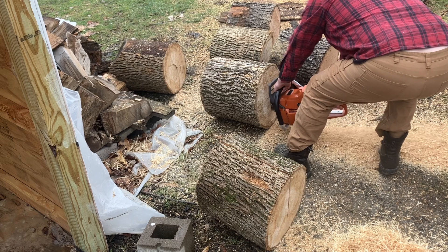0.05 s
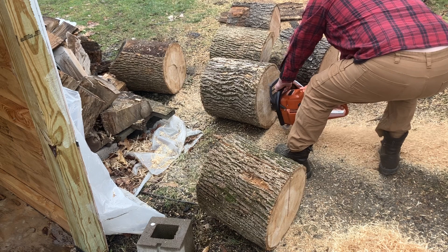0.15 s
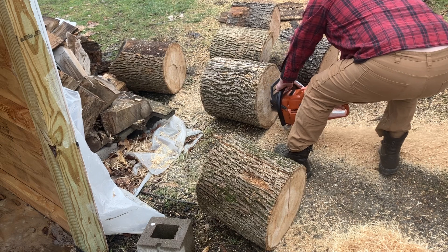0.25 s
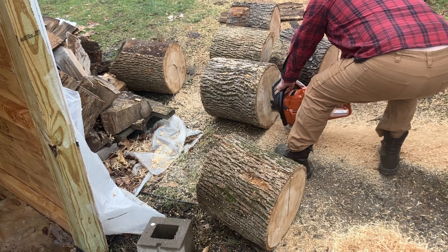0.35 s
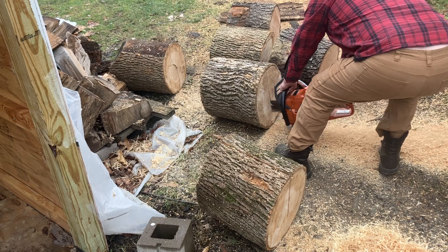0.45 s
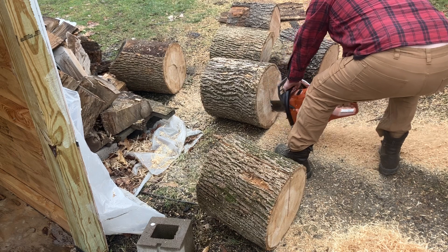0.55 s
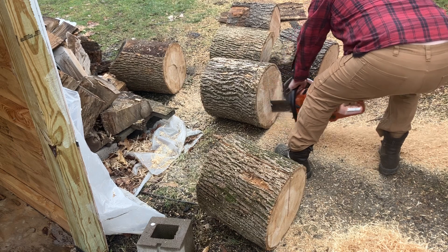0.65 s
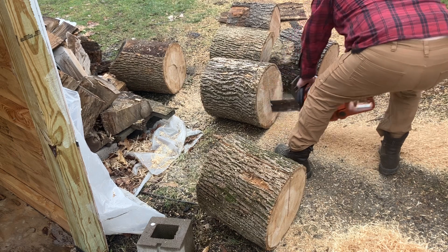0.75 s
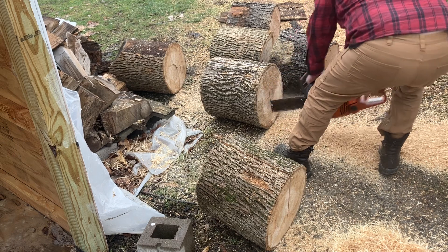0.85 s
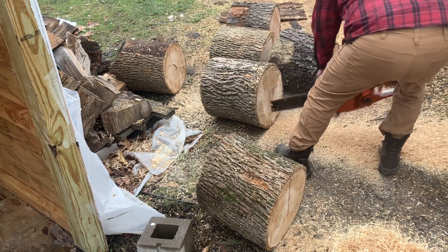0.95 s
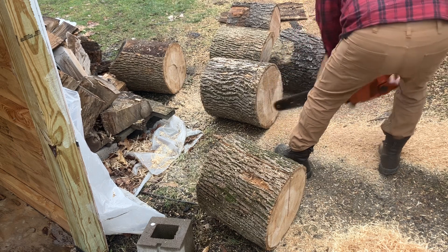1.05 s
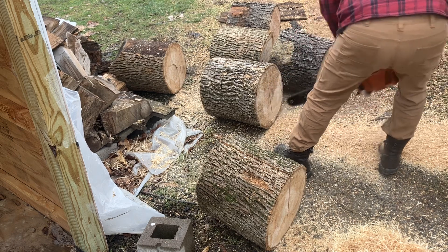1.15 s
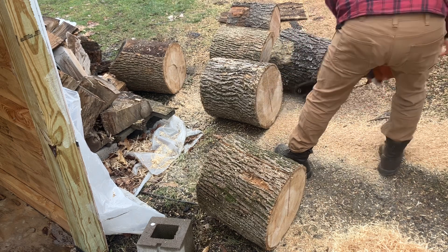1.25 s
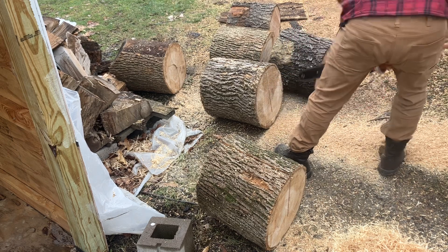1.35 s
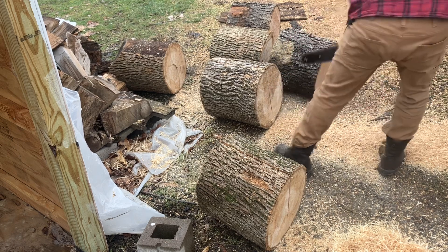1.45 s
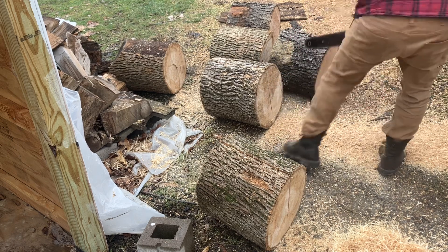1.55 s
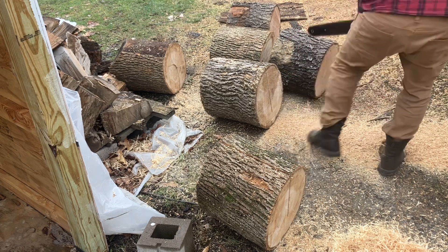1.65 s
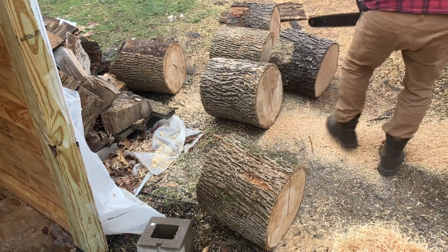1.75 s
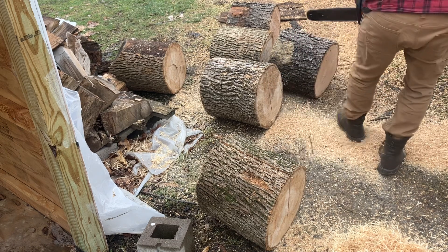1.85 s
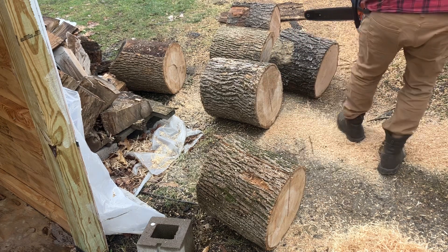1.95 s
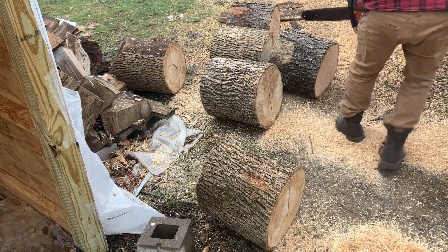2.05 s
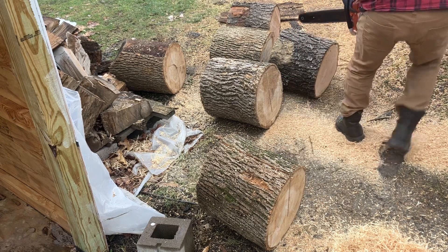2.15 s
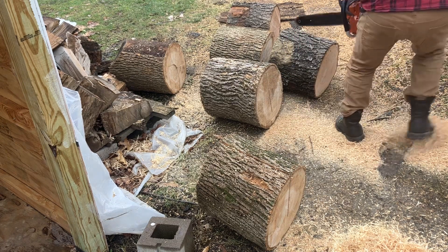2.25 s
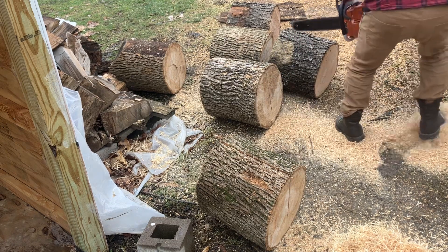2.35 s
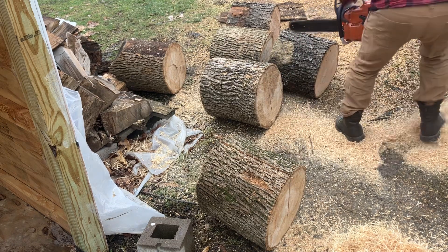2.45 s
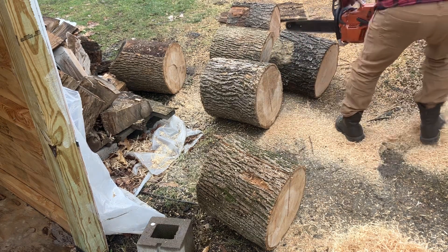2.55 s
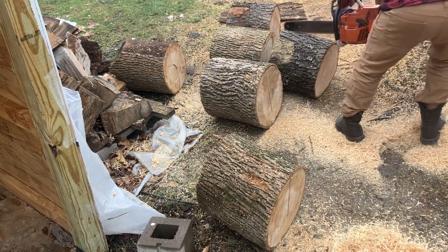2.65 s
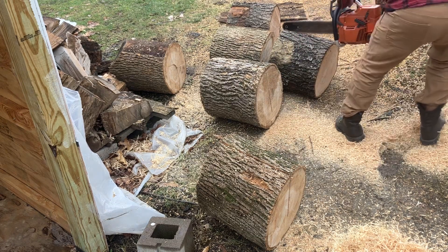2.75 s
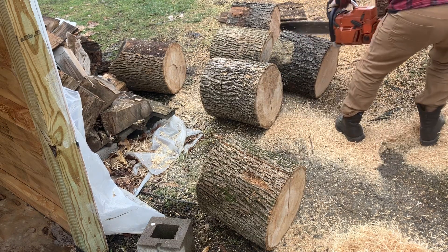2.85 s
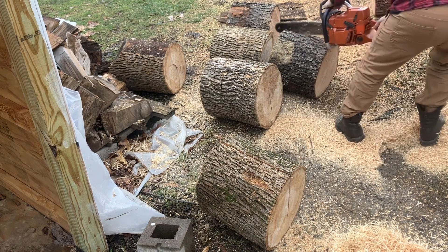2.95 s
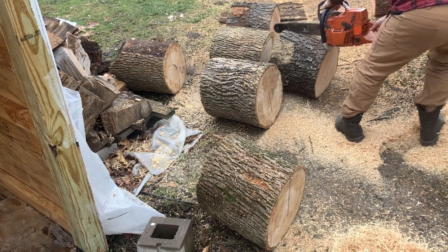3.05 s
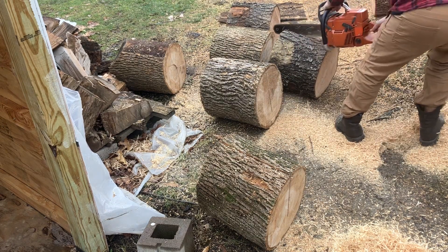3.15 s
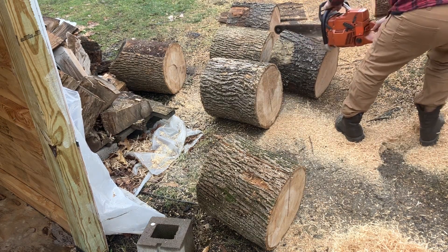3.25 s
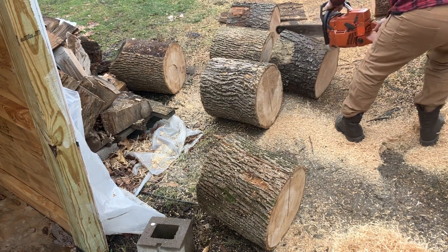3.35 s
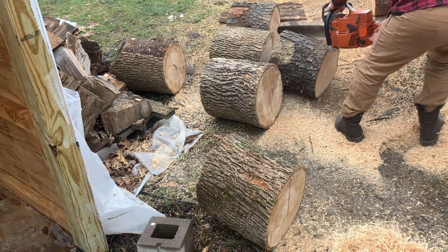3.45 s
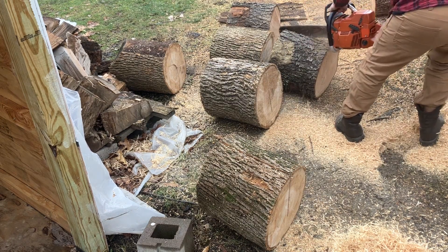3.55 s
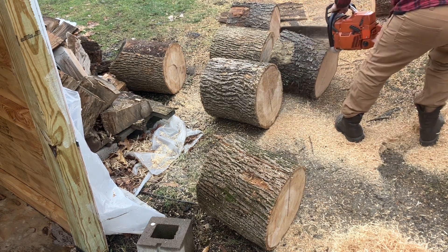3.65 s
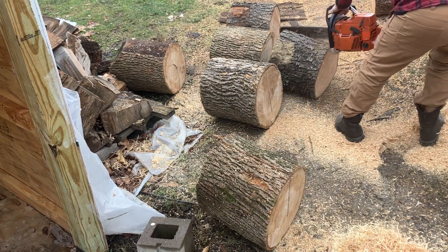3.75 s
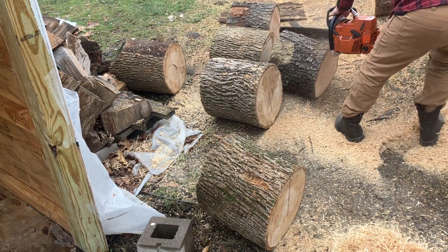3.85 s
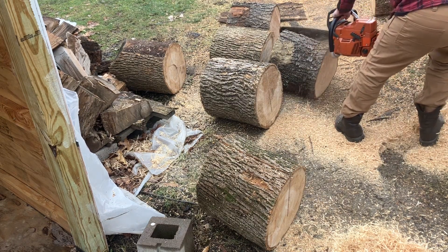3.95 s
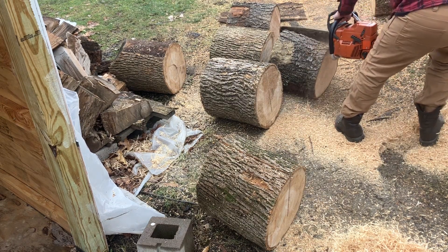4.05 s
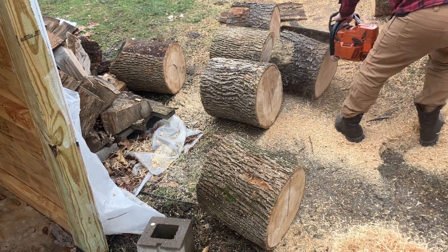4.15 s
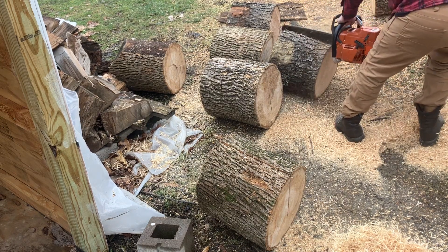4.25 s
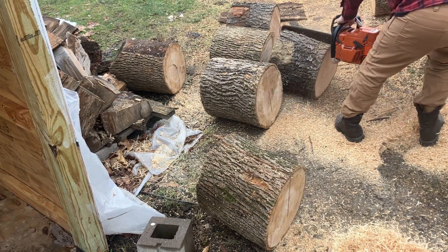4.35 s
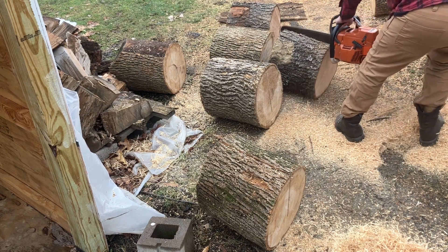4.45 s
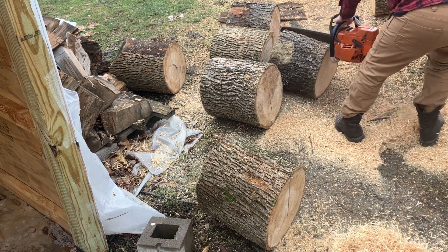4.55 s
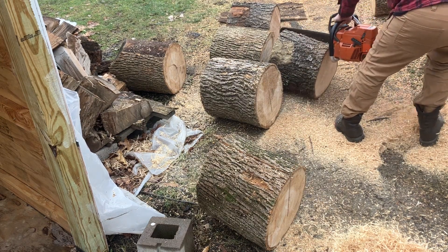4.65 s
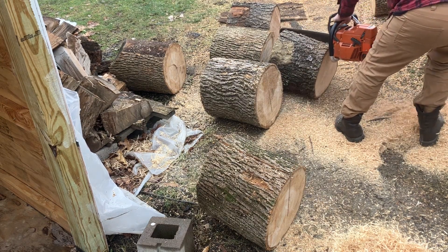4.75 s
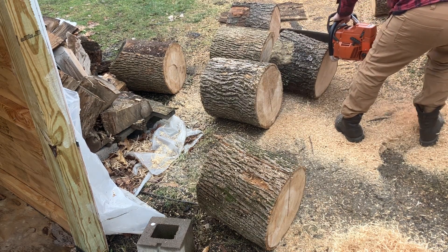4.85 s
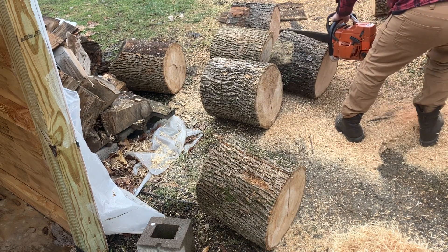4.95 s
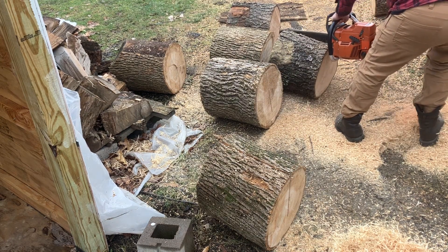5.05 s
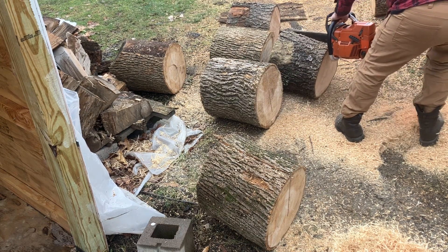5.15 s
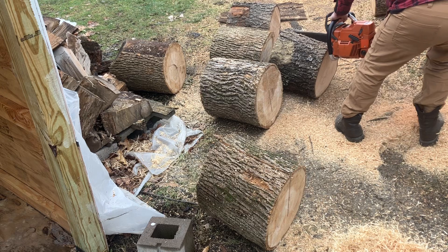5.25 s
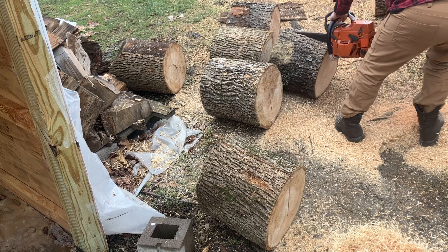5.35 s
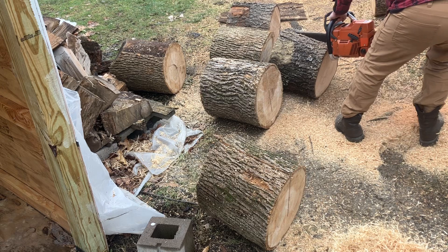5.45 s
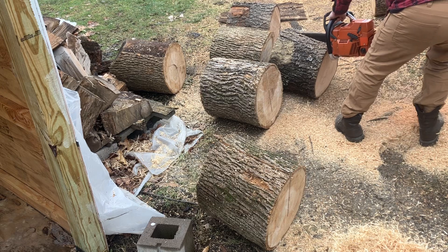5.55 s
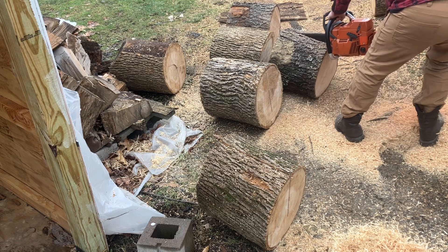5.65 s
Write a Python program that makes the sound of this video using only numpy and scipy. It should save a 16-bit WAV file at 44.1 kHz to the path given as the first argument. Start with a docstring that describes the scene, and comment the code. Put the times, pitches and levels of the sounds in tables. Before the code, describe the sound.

Outdoors, a chainsaw finishes a cut, coasts down popping, blips briefly, then screams back to full speed, stuttering before digging into wood under load.

```python
"""A two-stroke chainsaw finishes a cut, coasts down with a few pops and one blip, then bites into the next log.
Each firing rings the muffler and spurts a jet of gas; skipped turns leave fuel, so the next firing bangs. The
intake drones, the piston pumps soft puffs, the chain whines at its tooth rate and rattles on the bar. The
ground, the body, a woodpile and a shed wall echo it to a phone in stereo, over faint air and gusts."""
import sys
import numpy as np
from scipy import signal
from scipy.fft import rfft, irfft
from scipy.io import wavfile
from scipy.ndimage import uniform_filter1d, map_coordinates

SR = 44100
rng = np.random.default_rng(int(sys.argv[2]) if len(sys.argv) > 2 else 0)


def persist_wave(psi):
    """Save psi, clipped to +-1, as 16-bit WAV."""
    counts = np.round(np.clip(psi, -1, 1) * 32767).astype(np.int16)
    wavfile.write(sys.argv[1], SR, np.atleast_2d(counts).T)


N = 251811
TIME = np.arange(N) / SR
FULL_HZ = 200  # full speed, turns per second

# Skipped firings. Each row: start in seconds, turns per firing, firings.
STUMBLES = [(2.828, 2, 1), (2.838, 3, 1), (2.854, 2, 2), (3.402, 2, 2), (3.427, 2, 2), (3.564, 2, 2),
            (3.584, 3, 1), (3.599, 2, 1), (3.619, 2, 8), (3.948, 2, 2), (4.21, 2, 1), (4.22, 3, 4),
            (4.279, 2, 1), (4.438, 2, 14)]
# Lone firings, throttle shut. Each row: time in seconds, level in dB.
POPS = [(0.726, -24), (0.742, -22), (1.3486, -31.5), (1.679, -32.5), (2.1526, -29.5), (2.446, -30)]
# Engine effort. Each row: time in seconds, firing level at full speed in dB,
# gas hiss re firing in dB before the jet's own gain, extra treble bite in dB.
EFFORT = [(0, -25, -13.5, 8), (.2, -23, -13, 3), (.72, -24.5, -12, 2.5), (1.7, -21.5, -19.5, 2.5),
          (1.81, -22, -18, 3), (2.5, -19, -15.5, -2.5), (3.3, -21.5, -12.5, 4.5), (4.05, -22.5, -13, 1.5),
          (4.8, -19.5, -17.5, -3), (5.03, -19.5, -16.5, -4.5), (5.25, -19, -19.5, -3),
          (5.45, -20.5, -17, -3.5), (5.71, -18.5, -17, -5.5)]
# Boom of the muffler shell. Each row: frequency in Hz, level in dB.
BOOM_COLOUR = [(50, -28), (130, -1.5), (350, -13.5), (560, -3), (720, 1), (900, -3.5), (1400, -27),
               (6000, -65)]
# Unfired puffs, also played by pumping(). Each row: frequency in Hz, level in dB.
PUFF_COLOUR = [(50, -8), (120, 6.5), (220, 10), (300, 5), (400, 16.5), (500, 18), (650, 17), (850, 18),
               (1100, 0), (1800, -8), (2300, -4), (4000, -35.5), (9000, -23)]
# Exhaust gas. Each row: frequency in Hz, level in dB.
GAS_COLOUR = [(200, -27), (600, -21), (2600, -3), (3600, 0), (4600, -1.5), (7000, -.5), (9000, -3),
              (11000, 2.5), (13000, -12), (16000, -6)]
BLAST_LAG_S = .0021  # from start of turn to blast at the muffler
FIRING_DB_PER_OCTAVE = 8  # growth with speed
OPENING_DB, OPENING_S = -4, .027  # firings are weak near a throttle opening
# at full speed; scatter and rasp grow as speed falls
SCATTER_DB, RASP_DB = .3, -26
SLOW_SCATTER_DB_PER_OCTAVE, SLOW_RASP_DB_PER_OCTAVE = .7, 5
# bang level re plain firing, its scatter, its ragged share, its jet's extra level, unfired puff re firing
BANG_DB, BANG_SCATTER_DB, BANG_RASP_DB, BANG_JET_DB, MISS_DB = 3.1, 1.1, -14, .5, -9
# late ignition of a bang; its crack re bang, decay, lower edge
BANG_LATE_S, CRACK_DB, CRACK_S, CRACK_HZ = .0008, -9, .0007, 2200
BOOM_DB = -8  # re bang or pop


def exhaust(turns, hz, jet_db=5.0, jet_s=.0028, bite_hz=1800):
    """One firing a turn under throttle; a skipped turn leaves extra fuel, so the next one bangs."""
    missed = np.zeros(len(turns), bool)
    for start, every, bangs in STUMBLES:
        k = np.arange(every * bangs)
        # begins with the turn under way at start
        missed[np.searchsorted(turns, start) - 1 + k[k % every > 0]] = True
    bang = np.roll(missed, 1)
    fired = throttle(turns) & ~missed

    turn_hz = np.interp(turns, TIME, hz)
    slow = -octaves(turn_hz)
    scatter_db = np.where(bang, BANG_SCATTER_DB, SCATTER_DB + SLOW_SCATTER_DB_PER_OCTAVE * slow)
    level_db = curves(EFFORT, turns)[0] - FIRING_DB_PER_OCTAVE * slow
    level_db = level_db + scatter_db * rng.standard_normal(len(turns))
    level_db = level_db + OPENING_DB * sum(np.exp(-abs(turns - opens) / OPENING_S) for opens, _ in PULLS[1:])

    pop_s, pop_db = np.transpose(POPS)
    firing_s = turns + BLAST_LAG_S + BANG_LATE_S * bang
    times = np.r_[firing_s[fired], pop_s]
    sizes = undb(np.r_[(level_db + BANG_DB * bang)[fired], pop_db])
    sizes = sizes * np.sqrt(SR / np.interp(times, TIME, hz))  # same power at any firing rate
    is_bang = np.r_[bang[fired], np.zeros(len(pop_s))]
    is_bang_or_pop = np.r_[bang[fired], np.ones(len(pop_s))]

    # bangs and pops burn raggedly
    rasp_db = np.where(bang, BANG_RASP_DB, RASP_DB + SLOW_RASP_DB_PER_OCTAVE * slow)
    rasp = undb(np.r_[rasp_db[fired], np.full(len(pop_s), BANG_RASP_DB)])
    blasts = clicks(times, sizes) + bursts(times, sizes * rasp, decay_s=.002)
    note = chambers(muffler(blasts))
    note = note + (undb(curves(EFFORT)[2]) - 1) * band(note, bite_hz, "high")
    note = band(note, 255, "high", order=4)  # small outlet radiates little bass

    puff_sizes = undb(level_db[missed] + MISS_DB) * np.sqrt(SR / turn_hz[missed])
    puffs = colour(clicks(turns[missed] + BLAST_LAG_S, puff_sizes), PUFF_COLOUR)
    crack = band(bursts(times, sizes * is_bang * undb(CRACK_DB), CRACK_S), CRACK_HZ, "high")
    hiss_db = curves(EFFORT, times)[1] + jet_db + BANG_JET_DB * is_bang
    jet = colour(gas_jet(times, sizes * undb(hiss_db), jet_s), GAS_COLOUR)
    boom = colour(clicks(times, sizes * undb(BOOM_DB) * is_bang_or_pop), BOOM_COLOUR)
    return off_ground(note + crack + chambers(boom + puffs + jet))


# Throttle pulls. Each row: opening in seconds, shutting in seconds.
PULLS = [(0, .72), (1.691, 1.818), (2.463, 5.72)]


def throttle(at):
    """True while the throttle is open."""
    return sum((at >= opens) & (at <= shuts) for opens, shuts in PULLS) > 0


def skipping():
    """Share of turns a stumble leaves unfired, at every moment, taking turns at full speed."""
    share = 0
    for start, every, bangs in STUMBLES:
        inside = (TIME >= start) & (TIME < start + every * bangs / FULL_HZ)
        share = share + inside * (1 - 1 / every)
    return share


# Speed limit set by the wood, last cut. Each row: time in seconds, crank speed in Hz.
LAST_CUT_SPEED = [(0, 178.1), (.4, 186.4), (.72, 198.3)]
# Speed limit set by the wood, next cut. Each row: time in seconds, crank speed in Hz.
NEXT_CUT_SPEED = [(2.68, 180.5), (2.75, 194.7), (2.805, 199), (2.88, 195.8), (2.99, 203.8), (3.1, 200.6),
                  (3.19, 196.9), (3.25, 200), (3.31, 197.1), (3.393, 201.4), (3.46, 192.3), (3.517, 203.3),
                  (3.606, 204.1), (3.67, 193.6), (3.87, 193.4), (4.02, 191), (4.07, 195), (4.11, 190.6),
                  (4.16, 202), (4.222, 209.5), (4.28, 202), (4.32, 204), (4.37, 194.6), (4.456, 200.2),
                  (4.531, 197.5), (4.634, 174.6), (4.7, 172.8), (4.8, 178.5), (4.87, 177.5), (4.95, 173),
                  (5.08, 173.4), (5.12, 171), (5.18, 170.8), (5.252, 175.4), (5.41, 172.3), (5.51, 173.7),
                  (5.71, 164.3)]
PUSH_HZ_PER_S, FRICTION_HZ_PER_S, POP_KICK_HZ = 562, 76.7, 2.6
# drag at full speed, throttle open and shut; power of speed
OPEN_DRAG_HZ_PER_S, SHUT_DRAG_HZ_PER_S, DRAG_POWER = 254, 500, 6.43
SAG_HZ_PER_S, RECOVER_S = 267, .06  # sag in skipped firings and its recovery


def speed(size=32):
    """Turns per second: firing against friction and drag, held down by the wood, sagging in stumbles."""
    t, step_s = TIME[::size], size / SR
    held, = curves(LAST_CUT_SPEED + NEXT_CUT_SPEED, t)
    kicks = POP_KICK_HZ * np.bincount(np.searchsorted(t, np.transpose(POPS)[0]), minlength=len(t))
    inputs = throttle(t), held, kicks, skipping()[::size]
    hz, sag, out = held[0], 0, []
    for is_open, limit, kick, skipped in zip(*(c.tolist() for c in inputs)):
        drag = (OPEN_DRAG_HZ_PER_S if is_open else SHUT_DRAG_HZ_PER_S) * (hz / FULL_HZ) ** DRAG_POWER
        gain = PUSH_HZ_PER_S * is_open - FRICTION_HZ_PER_S - drag
        hz = min(hz + kick + gain * step_s, limit)
        sag += (SAG_HZ_PER_S * skipped - sag / RECOVER_S) * step_s
        out.append(hz - sag)
    return np.interp(TIME, t, out)


def octaves(hz):
    """Octaves above full speed; negative below it."""
    return np.log2(hz / FULL_HZ)


# Muffler colour in each stance. Each row: frequency in Hz, level in dB.
CUT_DEEP = [(200, 2), (365, -1), (550, -8), (720, -28), (790, 3), (910, 1.5), (1090, -7.5), (1290, -8.5),
            (1520, -5.5), (1850, -13), (2150, -15), (2900, -26), (3750, -9.5), (4200, -31), (5400, -25.5),
            (6900, -13), (9000, -39), (16000, -83)]
CUT_LOW = [(200, 0.5), (365, -2.5), (550, -9), (720, -7), (790, 8), (950, -3.5), (1130, -2.5), (1290, -11),
           (1520, -5.5), (1850, -20), (2150, -10), (2900, -20), (3500, -15), (3750, -6), (4100, -21),
           (5400, -27), (6700, -21.5), (9000, -48), (16000, -66)]
SHIELDED = [(200, -5), (380, -5.5), (460, -7), (560, -11), (684, 3), (760, -20), (840, -3.5), (1120, -14.5),
            (1280, -14.5), (1540, -15.5), (2000, -27), (3000, -26), (3600, -24), (4400, -74), (7000, -29.5),
            (9000, -41), (16000, -62)]
RAISED = [(200, -27.5), (380, 0), (590, -3), (790, -3), (990, 2.5), (1190, -4.5), (1400, -3.5),
          (1600, -3.5), (1800, -7), (2000, -9.5), (2300, -19), (2700, -12), (3100, -19.5), (3400, -12.5),
          (3600, -4.5), (3950, -12), (4600, -31), (6000, -20), (11000, -52), (16000, -48)]
ENTERING = [(200, -20), (380, -1), (580, 1), (770, 2.5), (960, 2), (1160, -5.5), (1350, -2.5), (1550, 1.5),
            (1750, -2), (2350, -15), (2700, -9), (3000, -18), (3650, -7.5), (4050, -7), (4600, -26),
            (7000, -26.5), (11000, -39), (16000, -60)]
BURIED = [(200, -23.5), (342, -27), (360, -12.5), (520, -0.5), (700, 0.0), (870, -1), (1040, -17.5),
          (1220, -5.5), (1400, -8.5), (1560, -1.5), (1605, -4), (1660, -4), (1730, -7.5), (2250, -15),
          (2800, -21.5), (3300, -8), (3550, -8), (4600, -27), (6500, -20.5), (11000, -44), (16000, -66)]


def muffler(x):
    """The exhaust's colour shifts as the saw is turned and sinks into the wood."""
    stances = enumerate((CUT_DEEP, CUT_LOW, SHIELDED, RAISED, ENTERING, BURIED), -1)
    return sum(colour(x * stance_share(k), shape) for k, shape in stances)


# Stance of the saw. Each row: time in seconds, stance number: -1 deep in the low cut, 0 finishing it,
# 1 shielded by the body, 2 raised, 3 entering the log, 4 buried in it.
STANCE = [(.3, -1), (.62, 0), (.75, 0), (1.3, 1), (2.15, 1), (2.45, 2), (3.4, 2), (3.75, 3), (4.4, 3),
          (4.65, 4)]


def stance_share(k):
    """How far the saw is in stance k, at every moment."""
    return np.maximum(1 - abs(curves(STANCE)[0] - k), 0)


def shielded():
    """How far the body hides the saw."""
    return stance_share(1)


# Muffler chamber resonances. Each row: frequency in Hz, width in Hz.
CHAMBERS = [(520, 300), (950, 700), (1500, 1200), (3600, 700), (6500, 900)]


def chambers(x):
    """All-pass resonances hold sound back and spread each blow over a millisecond or two."""
    for hz, width in CHAMBERS:
        pole = np.exp((2j * np.pi * hz - np.pi * width) / SR)
        a = np.poly([pole, pole.conjugate()]).real
        x = signal.lfilter(a[::-1], a, x)
    return x


JET_ALIKE = .42  # share of jet power that repeats from firing to firing


def gas_jet(times, sizes, decay_s, size=1024):
    """A spurt of gas at each firing: part of it is the same every time, the rest is fresh turbulence."""
    spurt = rng.standard_normal(size) * np.exp(-TIME[:size] / decay_s)
    alike = signal.fftconvolve(clicks(times, sizes), spurt / np.linalg.norm(spurt))[:N]
    return np.sqrt(JET_ALIKE) * alike + np.sqrt(1 - JET_ALIKE) * bursts(times, sizes, decay_s)


# Bounce off the ground. Each row: time in seconds, echo delay in seconds.
GROUND_ECHO = [(0, .00207), (.4, .00203), (.7, .00188), (1.3, .0024), (1.8, .0023), (2.45, .00184),
               (3, .001653), (3.5, .00164), (4.1, .001475), (4.7, .00145), (5.7, .00148)]
GROUND_ECHO_DB = -14
# echo off the swaying body: delay, random sway, sway points per second, level
BODY_S, SWAY_S, SWAY_HZ, BODY_DB = .0031, .00007, 7, -17


def off_ground(x):
    """The ground's moving echo makes resonances glide; the swaying body's echo makes the partials waver."""
    knots = np.arange(0, TIME[-1] + 1, 1 / SWAY_HZ)
    sway = np.interp(TIME, knots, rng.standard_normal(len(knots)))

    def late(delay_s):
        """Read x late by a moving delay."""
        return map_coordinates(x, [(TIME - delay_s) * SR])

    log = undb(GROUND_ECHO_DB) * late(curves(GROUND_ECHO)[0])
    body = undb(BODY_DB) * late(BODY_S + SWAY_S * sway)
    return x + log + body


# Pumping and chain. Each row: time in seconds, pumping at full speed in dB, chain rattle at full speed in dB.
SWING = [(.85, -37.5, -42), (1.5, -31, -45.5), (1.9, -36, -44), (2.4, -28, -37.5)]
PUFF_DB_PER_OCTAVE = 13  # growth with speed


def pumping(turns, hz):
    """The piston pumps a soft, nearly even puff through the muffler each turn, heard as the saw coasts."""
    level_db = curves(SWING)[0] + PUFF_DB_PER_OCTAVE * octaves(hz)
    sizes = undb(rng.standard_normal(len(turns)))
    flutter = bursts(turns, sizes * undb(-13), decay_s=.005)
    puffs = chambers(colour(clicks(turns, sizes) + flutter, PUFF_COLOUR))
    return undb(level_db) * puffs * np.sqrt(SR / hz)


# level at full speed, growth with speed, drop when nothing fires, drop behind the body
DRONE_DB, DRONE_DB_PER_OCTAVE, UNFIRED_DB, SHIELDED_DRONE_DB = -31, 7, -13.5, -5


def intake(crank, hz, settle_s=.0039, low_cut_db=-3.0):
    """The carburettor draws once a turn: a sine drone following speed and firing, weaker finishing the low cut."""
    firing = uniform_filter1d(throttle(TIME) * (1. - skipping()), int(settle_s * SR))
    level_db = DRONE_DB + DRONE_DB_PER_OCTAVE * octaves(hz) + UNFIRED_DB * (1 - firing)
    level_db = level_db + low_cut_db * stance_share(0) + SHIELDED_DRONE_DB * shielded()
    return undb(level_db) * unit(np.sin(2 * np.pi * crank))


# Whine at the tooth rate, four successive parts. Each row: time in seconds, level in dB.
WHINE_LAST_CUT = [(0.0, -66), (0.158, -52), (0.42, -33), (0.556, -36), (0.62, -58), (0.7, -50)]
WHINE_COASTING = [(.78, -52), (.9, -40), (1.08, -35), (1.2, -46), (1.32, -57), (1.65, -44.5), (1.84, -37),
                  (1.91, -48.5), (2.03, -40), (2.2, -58), (2.32, -48), (2.46, -41)]
WHINE_ENTERING = [(2.72, -35), (2.828, -35), (2.898, -29), (2.996, -32), (3.14, -29), (3.502, -28),
                  (3.538, -30.5), (3.81, -27), (4.166, -31.5), (4.196, -43), (4.39, -33), (4.5, -35.5)]
WHINE_BURIED = [(4.62, -33.5), (4.688, -44), (4.796, -28.5), (4.86, -30), (5.02, -55), (5.154, -32),
                (5.48, -57), (5.608, -30.5), (5.7, -34)]
# Running chain. Each row: frequency in Hz, level in dB.
CHAIN_COLOUR = [(200, -14), (600, -8.5), (1150, 15), (1520, 11), (1850, 6), (2250, 10.5), (2850, 3.5),
                (3350, 4.5), (5000, -2.5), (7500, 3.5), (11000, 2), (13000, -12), (16000, -19)]
RATTLE_DB_PER_OCTAVE = 6.5  # growth with speed
# even tick re ragged slap, random play of each link, fixed offset scatter of each tooth
TICK_DB, LINK_PLAY_S, TOOTH_ERROR_S = 4, 3e-5, 1.6e-4


def chain(crank, hz, count=6, wobble_db=5):
    """Sprocket teeth whine as they mesh; links tick and slap the bar, hardest once a turn, teeth off place."""
    teeth = count * crank
    whine_db, = curves(WHINE_LAST_CUT + WHINE_COASTING + WHINE_ENTERING + WHINE_BURIED)
    whine = undb(whine_db) * unit(np.sin(2 * np.pi * teeth))

    links = np.arange(int(teeth[-1]))
    force = undb(wobble_db * np.cos(2 * np.pi * links / count))
    tooth_error_s = TOOTH_ERROR_S * rng.standard_normal(count)
    play_s = LINK_PLAY_S * rng.standard_normal(len(links))
    times = np.interp(links, teeth, TIME) + tooth_error_s[links % count] + play_s
    hits = bursts(times, force, decay_s=.0034) + clicks(times, force * undb(TICK_DB))
    rattle_db = curves(SWING)[1] + RATTLE_DB_PER_OCTAVE * octaves(hz)
    return whine + undb(rattle_db) * unit(colour(hits, CHAIN_COLOUR))


# Stereo phase. Each row: frequency in Hz, phase of the left channel against the right in radians.
STEREO_PHASE = [(0, 0), (1890, -1.0), (2760, -0.53), (4130, -1.81), (5510, -2.5), (7150, -0.95), (8350, -3),
                (9560, -5), (10700, -4.5), (12300, -7.5), (12700, -12), (14400, -24), (15000, -10),
                (16600, -11)]
# Saw further left in the low cut. Each row: time in seconds, extra lead of the left channel in seconds.
LEFT_LEAD = [(.2, 4e-5), (.7, 2e-5), (1.1, -1.5e-5), (2, 0)]
# Woodpile and shed wall. Each row: delay in seconds, left level in dB, right level in dB.
ECHOES = [(.0068, -20, -17), (.0137, -17, -19)]
SHIELDED_TAIL_DB = 7  # more arrives by way of the yard behind the body


def yard(saw, tail_db=-14, t60_s=.29, tail_hz=12000, size=16384):
    """Direct sound on two channels, a few near echoes and a short scatter from the woodpile."""
    hz, radians = np.transpose(STEREO_PHASE)
    turned = np.exp(1j * np.interp(np.fft.rfftfreq(2 * N, 1 / SR), hz, radians))
    left = irfft(rfft(saw, 2 * N) * turned)[:N]
    left = map_coordinates(left, [(TIME + curves(LEFT_LEAD)[0]) * SR], order=5)
    out = np.array([left, saw])
    for delay_s, *sides_db in ECHOES:
        out = out + undb(sides_db)[:, None] * np.interp(TIME - delay_s, TIME, saw, left=0)

    t = TIME[:size]
    tail = band(rng.standard_normal((2, size)), tail_hz, "low", order=1)
    tail = tail * undb(-60 * t / t60_s) * (t > .004)
    tail = band(tail, 220, "high", order=1)
    tail = tail / np.linalg.norm(tail, axis=1, keepdims=True)
    scattered = saw * undb(tail_db + SHIELDED_TAIL_DB * shielded())
    return out + signal.fftconvolve(scattered[None], tail, axes=1)[:, :N]


# Open air. Each row: frequency in Hz, level in dB.
AIR_COLOUR = [(25, -40), (60, -15), (120, -33), (300, -22), (1000, -9), (4000, -45), (16000, -2)]
# Air buffeting the microphone. Each row: centre in seconds, level in dB, half length in seconds.
GUSTS = [(0.748, -44, 0.018), (2.877, -43, 0.023), (3.452, -26, 0.025), (3.631, -51, 0.076),
         (4.267, -33, 0.036), (4.479, -41, 0.031)]
GUST_LOW_HZ = 42  # lower edge


def air(floor_db=-62, gust_hz=75, apart=1.0):
    """A quiet outdoor noise floor, and brief low buffets, partly shared by the two channels."""
    floor = np.array([colour(rng.standard_normal(N), AIR_COLOUR) for _ in range(2)])
    swell = sum(undb(db) * np.exp(-((TIME - s) / half_s) ** 2) for s, db, half_s in GUSTS)
    noise = rng.standard_normal(N) + apart * rng.standard_normal((2, N))
    rumble = band(band(noise, gust_hz, "low"), GUST_LOW_HZ, "high")
    return undb(floor_db) * floor + swell * unit(rumble)


def undb(db):
    """Decibels to gain."""
    return 10 ** (np.asarray(db) / 20)


def unit(x):
    """Scale to rms 1."""
    return x / np.sqrt(np.mean(x ** 2))


def curves(rows, at=TIME):
    """The columns of a table, read at the given times."""
    s, *columns = np.transpose(rows)
    return [np.interp(at, s, c) for c in columns]


def colour(x, points, size=4096):
    """Ring x through a minimum-phase response of unit energy with the given (Hz, dB) shape."""
    hz, db = np.transpose(points)
    bins = np.maximum(np.fft.rfftfreq(size, 1 / SR), 1)
    gain = undb(np.interp(np.log(bins), np.log(hz), db))
    cepstrum = irfft(np.log(gain))
    # fold onto positive time: makes it causal
    cepstrum[1:size // 2] *= 2
    cepstrum[size // 2 + 1:] = 0
    response = irfft(np.exp(rfft(cepstrum)))
    return signal.fftconvolve(x, response / np.linalg.norm(response))[:N]


def band(x, hz, kind, order=2):
    """The part of x under or over a corner, without delay."""
    return signal.sosfiltfilt(signal.butter(order, hz, kind, fs=SR, output="sos"), x)


def clicks(times, sizes):
    """Band-limited clicks at exact times, as windowed sincs."""
    out = np.zeros(N)
    taps = (times * SR).astype(int)[:, None] + np.arange(-7, 9)
    offset = taps - times[:, None] * SR
    pulses = sizes[:, None] * np.sinc(offset) * np.sinc(offset / 8)
    np.add.at(out, np.clip(taps, 0, N - 1), pulses)
    return out


def bursts(times, sizes, decay_s, size=2048):
    """Noise that flares at each time and dies away; each burst has the energy of a click of that size."""
    shape = np.exp(-2 * TIME[:size] / decay_s)
    starts = np.bincount(np.clip(times * SR, 0, N - 1).astype(int), sizes ** 2, N)
    power = signal.fftconvolve(starts, shape / shape.sum())[:N]
    return np.sqrt(np.abs(power)) * rng.standard_normal(N)


JITTER_S = 4.5e-6  # timing spread of the turns


def scene():
    """The crank drives firings, pumping, intake and chain; the yard and the air surround them."""
    hz = speed()
    crank = np.cumsum(hz) / SR  # turns so far
    turns = np.interp(np.arange(1, int(crank[-1])), crank, TIME)
    turns = turns + JITTER_S * rng.standard_normal(len(turns))
    saw = exhaust(turns, hz) + pumping(turns, hz) + intake(crank, hz) + chain(crank, hz)
    return yard(saw) + air()


TOP_HZ = 15850


def record(dry):
    """The phone drops the deepest bass and cuts the top."""
    dry = signal.sosfilt(signal.butter(2, 32, "high", fs=SR, output="sos"), dry)
    return signal.sosfilt(signal.ellip(10, .2, 80, TOP_HZ, fs=SR, output="sos"), dry)


dry = scene()
out = record(dry)
persist_wave(out)
```